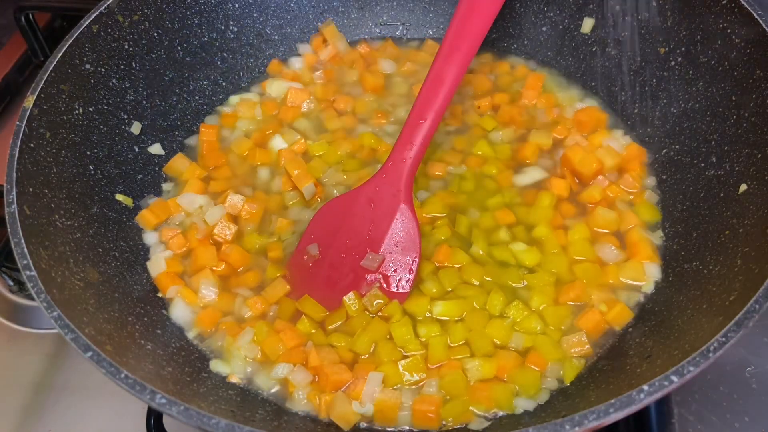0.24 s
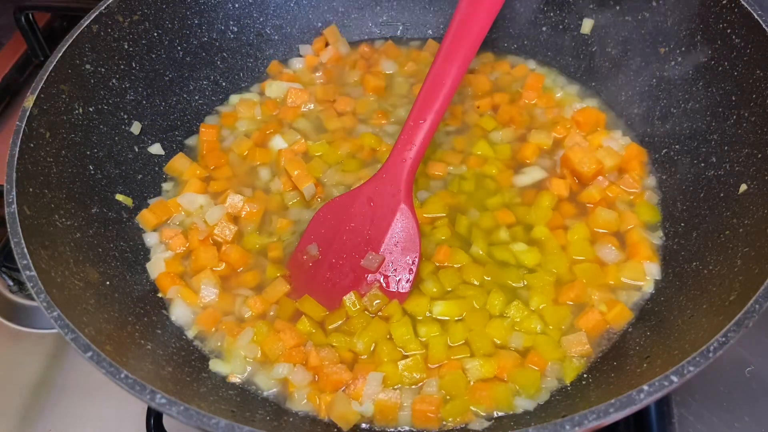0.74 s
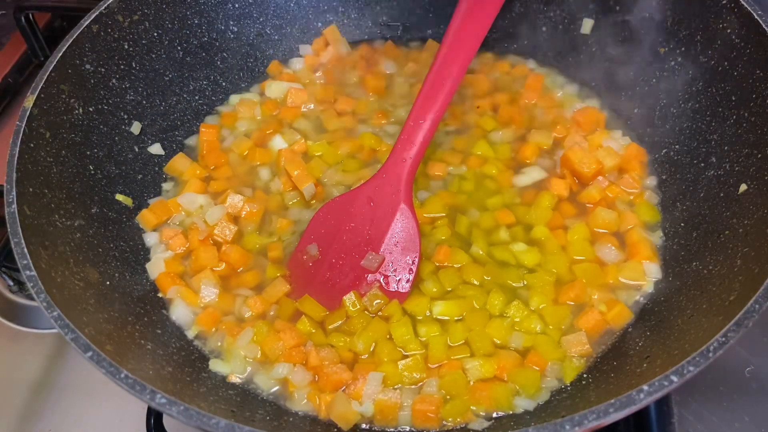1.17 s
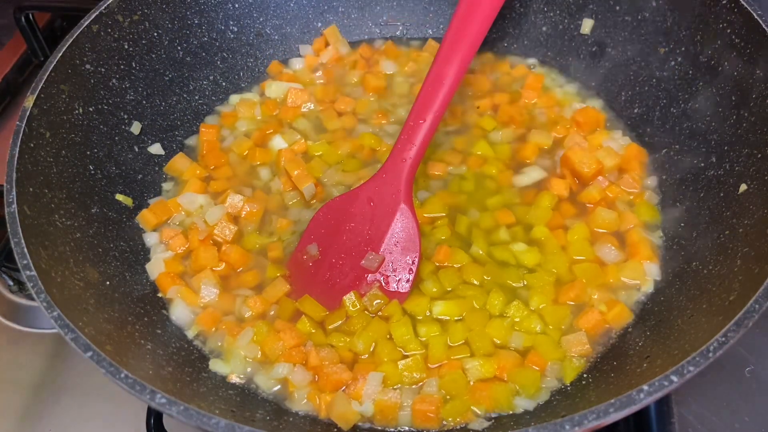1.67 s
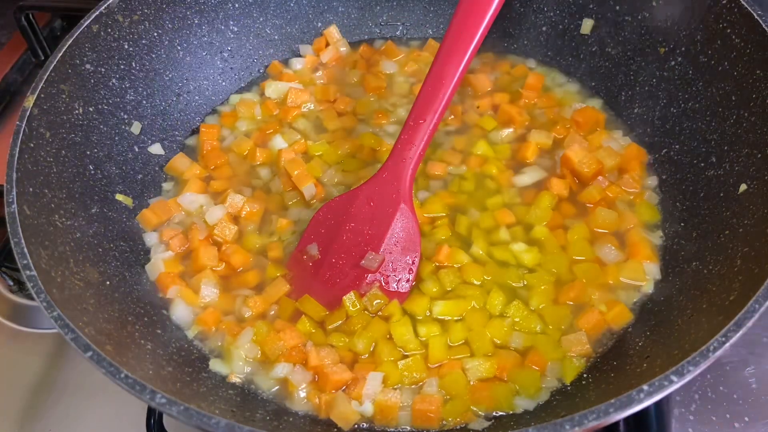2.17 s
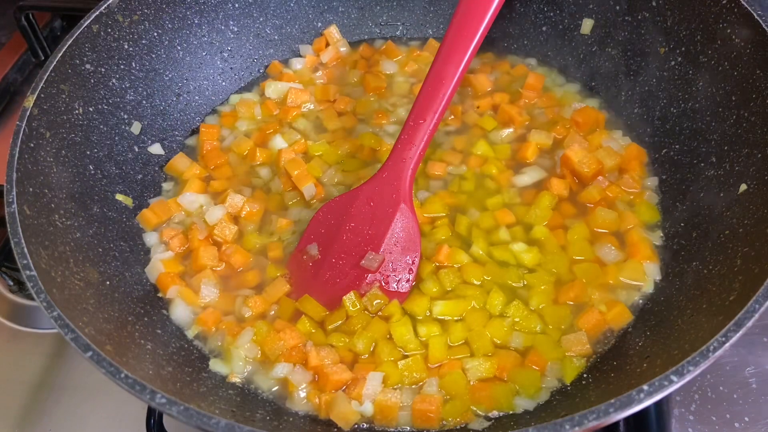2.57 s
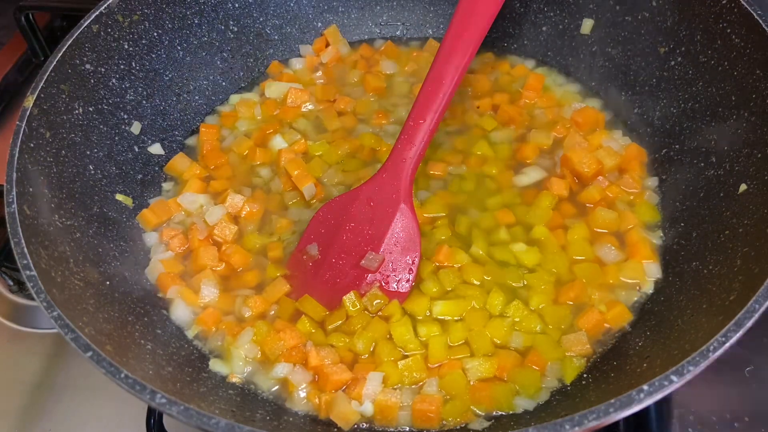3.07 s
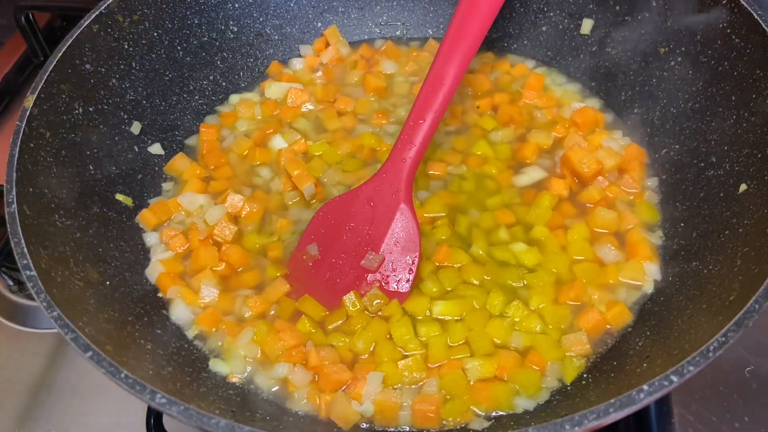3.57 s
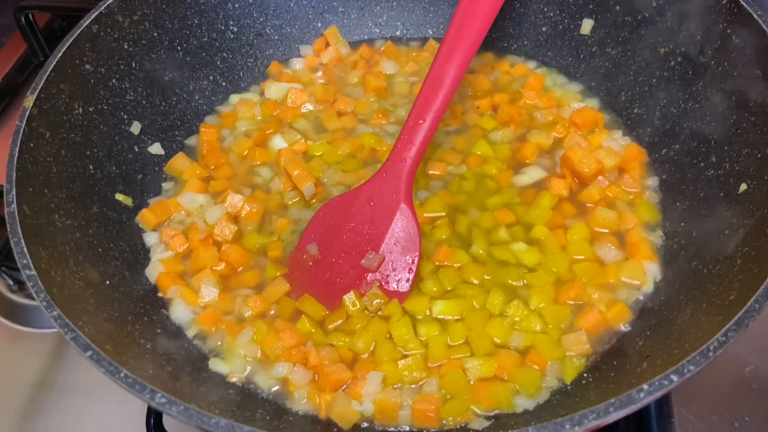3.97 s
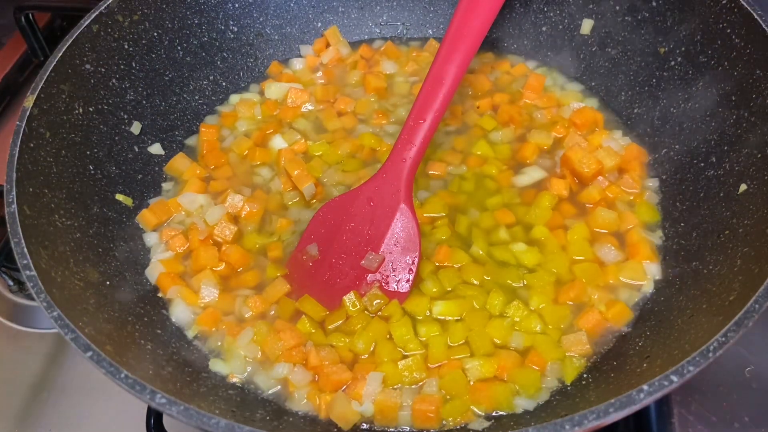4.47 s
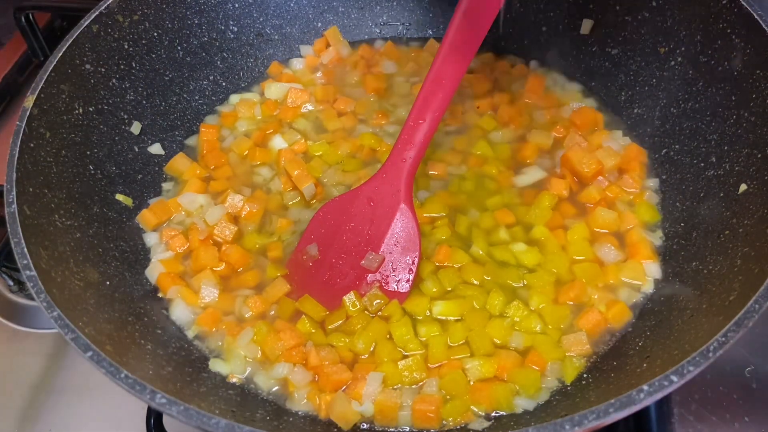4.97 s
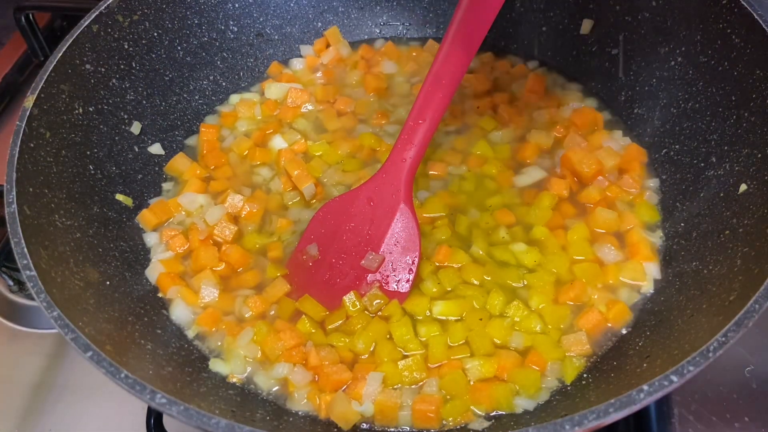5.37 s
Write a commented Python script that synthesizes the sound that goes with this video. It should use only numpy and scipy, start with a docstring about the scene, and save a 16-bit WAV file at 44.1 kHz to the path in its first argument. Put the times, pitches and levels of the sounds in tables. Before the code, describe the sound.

Close stereo pickup in a small, fairly dry home kitchen. Broth with diced vegetables simmers faintly, with fine hiss and tiny pops, over a soft burner rush, low rumble and mains hum. After two seconds, dull knocks lead to a dish landing with a short ringing clatter. Knocks and a hard utensil clack follow, then light ticks and another clack. Finally, thin plastic crackles brightly and close until the end.

```python
"""A small kitchen: diced vegetables simmer in broth in a pan, with a faint sizzle and tiny pops.
The burner's low rush and rumble join a mains hum. A dish is set down, utensils knock and click on
the worktop, and then a thin plastic wrapper is crinkled close by; the room answers these near sounds.
Short noise bursts make the contacts, fading sines and resonances the ringing, and shaped noise the rest."""
import sys
import numpy as np
from scipy import signal
from scipy.fft import rfft, irfft, next_fast_len
from scipy.io import wavfile
from scipy.ndimage import uniform_filter1d, map_coordinates

SR = 44100
rng = np.random.default_rng(int(sys.argv[2]) if len(sys.argv) > 2 else 0)


def master_out(mix):
    """Clip the mix to full scale and print it as 16-bit PCM to the path in sys.argv[1]."""
    frames = np.transpose(np.atleast_2d(mix))
    ceiling = np.clip(frames, -1, 1)
    pcm = np.round(ceiling * 32767).astype(np.int16)
    wavfile.write(sys.argv[1], SR, pcm)


N = 248503  # length in samples

# Levels in the tables are starting levels: the functions below add their own gains.
# Colours are relative, because every colouring filter is scaled to unit energy.
# "Left over right" says how many dB louder the left side is.

# The wrapper is held and whispers faintly. Each row: start in seconds, level in dB, hold in seconds.
HELD = [(4.535, -55, 0.7)]
# The wrapper is squeezed and rustles. Each row: start in seconds, level in dB, hold in seconds.
SQUEEZES = [(4.73, -43, 0.099), (4.90, -45, 0.083), (4.988, -34.5, 0.025), (5.22, -42, 0.04),
            (5.41, -42.5, 0.069), (5.618, -40.5, 0.021)]
SQUEEZE_ATTACK_S, SQUEEZE_RELEASE_S = 0.04, 0.048  # to swell and to fade by 20 dB
# The creases snap. Each row: start in seconds, level in dB, left over right in dB.
SNAPS = [(4.6497, -35, 1), (4.6767, -21, 3.5), (4.7031, -21, -3), (4.7245, -14.5, 1), (4.7535, -23, 5),
         (4.8415, -32, 3), (4.8792, -10.5, 2), (4.961, -34, 4), (4.9755, -8, 3.5), (4.987, -10, 3),
         (4.991, -11, 4), (5.0158, -8, 1.5), (5.0575, -19, 2), (5.0645, -22.5, 4), (5.1915, -26.5, 3),
         (5.2015, -22.5, 5), (5.2173, -8.5, 2), (5.2303, -19.5, 2), (5.2527, -18.5, 1), (5.264, -19.5, -1),
         (5.287, -36, 1), (5.296, -24, 2), (5.3816, -22.5, 1.5), (5.3895, -16, 1.5), (5.4175, -19, 3),
         (5.4212, -14.5, -4), (5.424, -6, 4.5), (5.4392, -20, 1), (5.4555, -22.5, 5), (5.618, -16, -3),
         (5.6243, -11, 6.5)]
# Colour of the snaps and the rustle. Each row: frequency in Hz, level in dB.
SNAP_COLOUR = [(150, -10.5), (300, -8.5), (500, -6.5), (750, -10.5), (1100, -6.5), (1700, -8), (2900, -9.5),
               (5000, -5.5), (7400, 6.5), (9000, -2), (11500, 1.5), (13500, -1), (15500, -4)]
SLIP_S, SLIP_LOSS_DB = 0.014, 14  # slips follow a snap within this time, this much weaker
# Whole panels buckle with a lower crack. Each row: start in seconds, level in dB, left over right in dB.
BUCKLES = [(4.987, -23.5, 7), (5.0154, -22, 4), (5.065, -27, -1), (5.264, -27.5, 3), (5.4095, -15, -0.5),
           (5.421, -36, 0), (5.482, -30, 4)]
# Colour of the buckling. Each row: frequency in Hz, level in dB.
BUCKLE_COLOUR = [(180, -46), (300, -20), (1100, 3), (1730, 9.5), (3500, -10), (4170, 8), (4910, -29),
                 (6000, -19), (7800, -46), (13200, -120)]
# The film slides on itself with a thin scrape. Each row: start in seconds, level in dB, hold in seconds.
SLIDES = [(4.908, -42.5, .015), (5.337, -50, .004)]
SLIDE_HZ = 4020
SLIDE_ATTACK_S, SLIDE_RELEASE_S = 0.026, 0.039  # to swell and to fade by 20 dB

# Dull knocks on the worktop. Each row: start in seconds, level in dB, left over right in dB.
KNOCKS = [(2.28, -34, 3), (2.357, -26, 3.5), (2.393, -31, -1), (3.0705, -38, 0), (3.134, -36.5, -1),
          (3.566, -29.5, -5), (3.5845, -17.5, -2.5)]
# Colour of the knocks. Each row: frequency in Hz, level in dB.
KNOCK_COLOUR = [(100, -1), (250, -7), (500, -3.5), (950, -10.5), (1400, -6.5), (1800, -14.5), (2200, -12.5),
                (3400, -22), (4800, -17), (8000, -30.5), (15000, -31)]
# Sharp utensil clacks. Each row: start in seconds, level in dB, left over right in dB,
# hollow ring in Hz, ring level in dB, time for the ring to fade by 60 dB in seconds.
CLACKS = [(3.7073, -10.5, -1, 378, -39.5, 0.15), (4.4204, -14.5, 1.5, 1065, -19.5, 0.019)]
# Colour of the clack itself. Each row: frequency in Hz, level in dB.
CLACK_COLOUR = [(200, -34), (360, -0.5), (650, -13), (1150, -7.5), (1800, -3.5), (2500, -9.5), (3700, -4.5),
                (5200, -9), (7500, -9.5), (11500, -11), (15500, -20)]
# Colour of the bright after-ring of a clack. Each row: frequency in Hz, level in dB.
AFTER_RING_COLOUR = [(1500, -12), (1800, -5), (2600, -11), (3400, 4), (4200, 4.5), (5200, -1), (7500, -11)]
# The utensil's own note, this far below the clack's level in the table
UTENSIL_HZ, UTENSIL_T60_S, UTENSIL_BELOW_DB = 3480, 0.032, 14.5
# A light utensil ticks on the worktop. Each row: start in seconds, level in dB.
TICKS = [(2.176, -35), (4.0585, -23), (4.0838, -10), (4.094, -23.5), (4.111, -21.5), (4.130, -29.5),
         (4.16, -27.5), (4.1657, -32), (4.233, -31), (4.2897, -26)]
# Colour of the ticks. Each row: frequency in Hz, level in dB.
TICK_COLOUR = [(300, -7), (950, -6.5), (2000, 1.5), (3500, -7), (4500, -2.5), (5300, -2.5), (6300, -13.5),
               (8000, -26.5), (15000, -26)]
TICK_PAN_DB = 3  # left over right
# The light utensil's note, this far below the tick's level in the table
TICK_RING_HZ, TICK_RING_T60_S, TICK_RING_BELOW_DB = 5330, 0.015, 12

# The dish touches, lands and rocks. Each row: start in seconds, level in dB, left over right in dB.
DISH_TOUCHES = [(2.396, -42, 11), (2.4832, -19.5, 9.5), (2.4882, -20, 0), (2.4921, -16.5, 1),
                (2.5001, -23.5, 2), (2.509, -24, 1), (2.523, -29, 0)]
# Notes the dish rings at. Each row: frequency in Hz, level in dB, time to fade by 60 dB in seconds.
DISH_MODES = [(143, -5, 0.3), (175.7, -6, 0.32), (413, -12, 0.19), (504, -8.5, 0.19), (559.6, -6, 0.16),
              (610.7, -10, 0.13), (886, -5.5, 0.12), (3680, -9, 0.13), (3952, 2, 0.16), (4918, -9, 0.15),
              (4970, -4.5, 0.099), (5800, -17, 0.1)]
# Colour of the dish's clatter. Each row: frequency in Hz, level in dB.
DISH_COLOUR = [(90, -8), (160, 3.5), (260, -8.5), (520, -1.5), (900, -11.5), (1200, -14.5), (2400, -19),
               (3200, -22), (3850, -9), (4400, -20), (5000, -4.5), (5800, -20.5), (11000, -31),
               (14000, -38)]
# Soft low thuds. Each row: start in seconds, level in dB, pitch in Hz, time to fade by 60 dB in seconds.
THUDS = [(1.008, -46.5, 128.4, 0.22), (1.361, -41.5, 144, 0.097), (2.513, -36, 152, 0.16),
         (3.587, -33, 241, 0.14), (3.964, -27.5, 102, 0.098), (3.989, -23.5, 73.4, 0.069)]
# Thin high pips. Each row: start in seconds, level in dB.
PIPS = [(3.0883, -44.5), (3.2575, -44.5), (3.3966, -39.5), (3.428, -44), (5.3317, -39), (5.338, -33.5),
        (5.346, -41.5)]
# Colour of the pips. Each row: frequency in Hz, level in dB.
PIP_COLOUR = [(3000, -19.5), (4000, -24), (5000, -21), (6700, -28), (7500, 0.5), (8400, -39), (11000, -23)]
PIP_PAN_DB = 2  # left over right

# Colour of the pan's hiss. Each row: frequency in Hz, level in dB.
SIZZLE_COLOUR = [(1500, -9), (3000, -7.5), (4200, -5.5), (7000, 0), (11000, -2.5), (15500, -1.5)]
SIZZLE_DB = -60.5  # the steady simmer
# The broth wells up against the hot rim. Each row: start in seconds, level in dB, hold in seconds.
SURGES = [(.995, -58.5, 0.053), (1.335, -59, 0.015)]
SURGE_ATTACK_S, SURGE_RELEASE_S = 0.11, 0.054  # to swell and to fade by 20 dB
SPIT_ABOVE_DB = 7  # bubbles spit about this far above the surge of the moment
# Colour of the spitting. Each row: frequency in Hz, level in dB.
SPIT_COLOUR = [(1000, 1), (3000, -1), (7000, 3), (15000, 2)]
# The larger bubbles burst with a sharp tick. Each row: start in seconds, level in dB.
POPS = [(0.4552, -41), (0.619, -42.5), (.681, -48), (.75, -44), (1.1059, -44), (1.5504, -50), (1.8293, -42),
        (2.068, -43), (2.232, -45), (3.5075, -37)]
# Colour of the bursting bubbles. Each row: frequency in Hz, level in dB.
POP_COLOUR = [(1500, 1), (4000, -11.5), (7000, 2), (11000, 4.5), (15500, 1.5)]
# Steam escapes in a faint whistle. Each row: start in seconds, level in dB, hold in seconds.
WHISTLES = [(.67, -65.5, 0.056), (1.14, -69, 0.4)]
WHISTLE_HZ, WHISTLE_FADE_S = 2170, 0.076  # pitch; time to swell or fade by 20 dB
GRAIN_SPREAD_DB = 3.5  # average gain of a grain over the smallest, before a cap

# Colour of the burner's rush. Each row: frequency in Hz, level in dB.
BURNER_COLOUR = [(150, -10.5), (250, -7), (402, 0), (566, -1.5), (1090, -2), (1430, 2.5), (1580, -7.5),
                 (1990, -6.5), (2150, -8), (2300, -9), (3500, -14.5), (4550, -9), (7700, -120)]
# Colour of the low rumble. Each row: frequency in Hz, level in dB.
RUMBLE_COLOUR = [(18, -12), (30, -15), (54, -4.5), (76, -10), (151, -15.5), (220, -27), (249, -23),
                 (350, -31.5), (460, -78), (770, -120)]
# Rise and fall of the rumble. Each row: time in seconds, level in dB.
RUMBLE_LEVEL = [(0, -63), (.55, -70.5), (1.0, -61.5), (2.3, -61.5), (3.0, -61), (5.6, -59)]
BURNER_FOLLOWS = 0.36  # share of the rumble's rise and fall in dB heard in the rush

# How alike left and right are. Each row: frequency in Hz, correlation (1 is identical).
LIKENESS = [(60, 0.91), (130, 0.84), (300, 0.51), (700, 0.1), (1300, 0.46), (3000, 0.23), (7000, 0.51),
            (15000, 0.037)]
FRONT_LAG_S, LAG_FROM_HZ = 0.000227, 6500  # treble lag on the left, and where it begins
KITCHEN_T60_S = 0.18  # time for the reflections to fade by 60 dB
CUTOFF_HZ = 16300


def wrapper():
    """Each squeeze raises a gritty rustle; creases snap one by one, panels buckle and the film slides."""
    effort = swells(SQUEEZES, SQUEEZE_ATTACK_S, SQUEEZE_RELEASE_S)
    whisper = swells(HELD, SQUEEZE_ATTACK_S, SQUEEZE_RELEASE_S)
    loudness = np.hypot(effort, whisper)
    grit = pitched_grains(2500, 1500, 15000, cycles=12) + rms_one(grains(4000))
    flicker = from_db(0.25 + 2.0 * drift(140))
    rustle = loudness * flicker * rms_one(coloured(grit, SNAP_COLOUR))
    scrape = swells(SLIDES, SLIDE_ATTACK_S, SLIDE_RELEASE_S) * narrow_noise(SLIDE_HZ, width_hz=600)
    snaps = contacts(with_slips(SNAPS), SNAP_COLOUR, crack_t60=0.011, body_t60=0.045, body_db=-23,
                     rise_s=0.0004, direct_share=0.92, vary_db=2.5)
    buckles = contacts(BUCKLES, BUCKLE_COLOUR, crack_t60=0.015, body_t60=0.036, body_db=-14.0)
    return from_front(rustle + scrape + from_db(-0.5) * snaps + from_db(-3.5) * buckles)


def with_slips(snaps, count=2):
    """After a crease snaps it gives way further in small, weaker slips."""
    rows = list(snaps)
    for s, level_db, pan_db in snaps:
        for delay in SLIP_S * rng.uniform(0.19, 1, count):
            rows.append((s + delay, level_db - SLIP_LOSS_DB, pan_db))
    return rows


def utensils():
    """Dull knocks, hollow clacks with a bright after-ring, and the small rattle of a light utensil."""
    ticks = [(s, level_db, TICK_PAN_DB) for s, level_db in TICKS]
    blows = [row[:3] for row in CLACKS]
    out = from_db(-8.0) * contacts(KNOCKS, KNOCK_COLOUR, crack_t60=0.028, body_t60=0.16, body_db=-14.5,
                                   left_lag_s=0.00038)
    out += from_db(-5.5) * contacts(blows, CLACK_COLOUR, crack_t60=0.016, body_t60=0.078, body_db=-19.5,
                                    left_lag_s=0.000346)
    out += from_db(-26.5) * contacts(blows, AFTER_RING_COLOUR, crack_t60=0.035, body_t60=0.27, body_db=-6)
    out += from_db(-6) * contacts(ticks, TICK_COLOUR, crack_t60=0.0055, body_t60=0.06, body_db=-16.5,
                                  left_lag_s=0.00026, rise_s=0.00023, direct_share=0.89)
    for s, level_db, pan_db, hz, ring_db, t60 in CLACKS:
        hollow = from_db(ring_db) * ring(hz, t60)
        note = from_db(level_db - UTENSIL_BELOW_DB) * ring(UTENSIL_HZ, UTENSIL_T60_S)
        add(out, s, panned(pan_db) * (hollow + note))
    for s, level_db, pan_db in ticks:
        note = from_db(level_db - TICK_RING_BELOW_DB) * ring(TICK_RING_HZ, TICK_RING_T60_S)
        add(out, s, panned(pan_db) * note)
    return out


def dish():
    """The dish lands with a clatter; every touch adds energy to its modes, which ring on."""
    out = from_db(-6.5) * contacts(DISH_TOUCHES, DISH_COLOUR, crack_t60=0.012, body_t60=0.18, body_db=-9.5)
    touches, t = np.zeros((2, N)), np.arange(N) / SR
    for s, level_db, pan_db in DISH_TOUCHES:
        add(touches, s, (from_db(level_db) * panned(pan_db)) ** 2)
    # Each touch passes its energy on over 64 samples
    touches = uniform_filter1d(touches, size=64, axis=1)
    for hz, mode_db, t60 in DISH_MODES:
        kept = from_db(-60 / (t60 * SR)) ** 2  # share of energy left after one sample
        energy = signal.lfilter([1], [1, -kept], np.abs(touches) + 1e-20)
        tone = np.sin(2 * np.pi * (hz * t + rng.random()))
        out += from_db(mode_db - 15.5) * np.sqrt(energy) * tone
    return out


def thuds(soft_hz=260):
    """Soft blows set the worktop booming briefly: fading low sines through a low-pass filter."""
    out = np.zeros((2, N))
    for s, level_db, hz, t60 in THUDS:
        add(out, s, from_db(level_db) * ring(hz, t60))
    return signal.sosfilt(signal.butter(2, soft_hz, fs=SR, output="sos"), out)


def pips():
    """Faint, narrow, high ticks made of short bursts of noise."""
    rows = [(s, level_db, PIP_PAN_DB) for s, level_db in PIPS]
    return from_db(2.0) * contacts(rows, PIP_COLOUR, crack_t60=0.013, body_t60=0.11, body_db=-9,
                                   rise_s=0.00029)


def pan_sizzle():
    """Broth hisses at the hot rim, micro-bubbles burst as a fine crackle and larger ones ring, tick or spit."""
    surge = swells(SURGES, SURGE_ATTACK_S, SURGE_RELEASE_S)
    vigour = np.hypot(from_db(SIZZLE_DB), surge)
    # One noise common to both sides plus a weaker one for each side
    white = rng.standard_normal(N) + from_db(-11) * rng.standard_normal((2, N))
    hiss = from_db(-2.0 + 2.3 * drift(30.3)) * rms_one(coloured(white, SIZZLE_COLOUR))
    prickle = from_db(-4.0) * rms_one(coloured(grains(60), POP_COLOUR))
    crackle = coloured(pitched_grains(330, 7500, 15000, cycles=12),
                       [(4000, -15), (8000, -3), (12000, 0), (15500, 0)])
    simmer = vigour * (hiss + prickle + from_db(-4.5) * rms_one(crackle))
    ticks = contacts([(s, db, 0) for s, db in POPS], POP_COLOUR, crack_t60=0.0072, body_t60=0.03,
                     body_db=-19, rise_s=0.0001, vary_db=1.5, direct_share=1.0)
    bursts = scattered(SURGES, surge, reach_s=0.0078, above_db=SPIT_ABOVE_DB, spread_db=2.5, count=5)
    spits = contacts(bursts, SPIT_COLOUR, crack_t60=0.02, body_t60=0.049, body_db=-10.0)
    ringing_bubbles = from_db(-72.5) * pitched_grains(70, 500, 3000, cycles=9)
    steam = swells(WHISTLES, WHISTLE_FADE_S, WHISTLE_FADE_S) * narrow_noise(WHISTLE_HZ, width_hz=80)
    return from_front(simmer + ticks + spits) + ringing_bubbles + steam


def scattered(rows, gain, reach_s, above_db, spread_db, count):
    """A few clicks at random moments in and around each swell, their strength following the swell."""
    clicks = []
    for s, _, hold_s in rows:
        places = (np.arange(count) + rng.random(count)) / count
        moments = s - reach_s + (hold_s + 2 * reach_s) * places
        level_db = 20 * np.log10(np.interp(moments, np.arange(N) / SR, gain) + 1e-9)
        size_db, pan_db = spread_db * rng.standard_normal((2, count))
        clicks += zip(moments, level_db + above_db + size_db, pan_db)
    return clicks


def stove():
    """The burner's rush and uneven rumble are shaped noise; the wavering mains hum is a 50 Hz sine."""
    rumble_db, = in_time(RUMBLE_LEVEL)
    phase = 2 * np.pi * 50 * np.arange(N) / SR
    hum = from_db(-57.5 + 1.0 * drift(5.56)) * np.sqrt(2) * np.sin(phase + 0.96 * drift(5))
    rumble = from_db(rumble_db + 5.5) * noise(RUMBLE_COLOUR)
    rush_db = -59.0 + BURNER_FOLLOWS * (rumble_db - rumble_db.mean())
    rush = from_db(rush_db) * noise(BURNER_COLOUR)
    return (hum + rumble + rush) * panned(1.9)


def kitchen(x, wall_cut_hz=7000, gap_s=0.0016):
    """Diffuse reflections that build up quickly and die away, dulled by the walls."""
    t = np.arange(SR // 2) / SR
    fade = from_db(-60 * t / KITCHEN_T60_S)
    build_up = 1 - np.exp(-(t / gap_s) ** 2)
    tail = as_stereo(rng.standard_normal((2, len(t)))) * fade * build_up
    tail = signal.lfilter(*signal.butter(1, wall_cut_hz, fs=SR), tail / np.linalg.norm(tail[0]))
    return signal.oaconvolve(x, tail, axes=1)[:, :N]


def contacts(rows, spectrum, crack_t60, body_t60, body_db, left_lag_s=0, rise_s=0.00035, vary_db=0,
             direct_share=0.14, size=4096):
    """Each contact is a brief crack, later on the left if lagged, and a diffuse ring; colour may vary."""
    out, t = np.zeros((2, N)), np.arange(size) / SR
    rise = 1 - np.exp(-t / rise_s)
    crack = rise * from_db(-60 * t / crack_t60)
    body = rise * from_db(body_db - 60 * t / body_t60)
    for s, level_db, pan_db in rows:
        right = rng.standard_normal(size) * crack
        left = np.interp(t - left_lag_s, t, right, left=0)
        direct = np.array([left, right])
        diffuse = as_stereo(rng.standard_normal((2, size))) * (np.sqrt(1 - direct_share) * crack + body)
        own_colour = [(hz, db + vary_db * rng.standard_normal()) for hz, db in spectrum]
        burst = coloured(np.sqrt(direct_share) * direct + diffuse, own_colour)
        # Both sides get the energy of the plain envelope
        burst *= np.linalg.norm(crack + body) / np.linalg.norm(burst, axis=1, keepdims=True)
        add(out, s, from_db(level_db) * panned(pan_db) * burst)
    return out


def ring(hz, t60):
    """One struck mode: a sine that starts at height 1 and fades by 60 dB in t60 seconds."""
    t = np.arange(SR // 2) / SR
    return np.sin(2 * np.pi * hz * t) * from_db(-60 * t / t60)


def grains(per_s):
    """Random clicks, mostly small and a few large, each with its own strength on either side."""
    sizes = from_db(GRAIN_SPREAD_DB * np.minimum(rng.exponential(1, N), 4))
    turn = rng.uniform(0, 2 * np.pi, N)
    happens = rng.random(N) < per_s / SR
    return sizes * happens * np.array([np.cos(turn), np.cos(turn + 0.21)])


def pitched_grains(per_s, low_hz, high_hz, cycles, count=12):
    """Random tiny bursts, each ringing for a few cycles at one of several pitches; unit power."""
    out = np.zeros((2, N))
    for hz in np.geomspace(low_hz, high_hz, count):
        r, w = from_db(-60 * hz / (cycles * SR)), 2 * np.pi * hz / SR  # fade and turn per sample
        clicks = grains(per_s / count) + 1e-18
        out += signal.lfilter([1, 0, -1], [1, -2 * r * np.cos(w), r * r], clicks)
    return rms_one(out)


def narrow_noise(hz, width_hz):
    """Stereo noise in one resonance, unit power."""
    band = signal.butter(2, [hz - width_hz / 2, hz + width_hz / 2], "band", fs=SR, output="sos")
    return rms_one(signal.sosfilt(band, rng.standard_normal((2, N))))


def noise(spectrum):
    """Steady stereo noise of unit power."""
    return rms_one(coloured(as_stereo(rng.standard_normal((2, N))), spectrum, size=8192))


def swells(rows, attack_s, release_s):
    """Gain over time: each row swells, holds and fades, by 20 dB per attack or release time."""
    t, gain = np.arange(N) / SR, np.zeros(N)
    for s, db, hold_s in rows:
        before, after = np.maximum(s - t, 0), np.maximum(t - s - hold_s, 0)
        gain += from_db(db - 20 * before / attack_s - 20 * after / release_s)
    return gain


def drift(rate):
    """A wandering curve with spread 1: straight lines between random points, rate points a second."""
    knots = rng.standard_normal(int(rate * N / SR) + 3)
    return rms_one(map_coordinates(knots, [np.arange(N) * rate / SR], order=1))


def coloured(x, spectrum, size=2048):
    """Causal (minimum-phase) filter with the given spectrum and unit energy."""
    hz = np.arange(size // 2 + 1) * SR / size
    low, high = np.array(spectrum)[[0, -1], 0]
    # Beyond both ends of the table the sound falls away
    skirts = 1 / np.sqrt((1 + (low / (hz + 1)) ** 6) * (1 + (hz / high / 1.2) ** 12))
    # Folding the cepstrum forward in time puts the energy as early as possible
    cepstrum = irfft(np.log(from_db(at_hz(spectrum, hz)) * skirts + 1e-6))
    cepstrum[1:size // 2] *= 2
    cepstrum[size // 2 + 1:] = 0
    response = irfft(np.exp(rfft(cepstrum)))
    response /= np.linalg.norm(response)
    return signal.oaconvolve(x, response[None], axes=1)[:, :x.shape[1]]


def as_stereo(x):
    """Two unrelated signals become left and right, as alike at each frequency as LIKENESS says."""
    size = next_fast_len(x.shape[1])
    a, b = rfft(x, size)
    alike = np.clip(at_hz(LIKENESS, np.arange(len(a)) * SR / size), -0.99, 0.99)
    mid, side = np.sqrt((1 + alike) / 2) * a, np.sqrt((1 - alike) / 2) * b
    return irfft(np.array([mid + side, mid - side]), size)[:, :x.shape[1]]


def from_front(x):
    """Sound from close in front is in step on both sides, but its high treble lags on the left."""
    size = next_fast_len(N + 1024)
    hz = np.arange(size // 2 + 1) * SR / size
    turn = -2 * np.pi * np.maximum(hz - LAG_FROM_HZ, 0) * FRONT_LAG_S
    left = irfft(rfft(x[0], size) * np.exp(1j * turn), size)[:N]
    return np.array([left, x[1]])


def panned(db):
    """Left and right gains for a level difference, left over right."""
    return from_db(np.array([[db], [-db]]) / 2)


def add(out, s, sound):
    """Mix a short sound in at time s."""
    i = int(np.clip(round(s * SR), 0, N - 1))
    out[:, i:i + sound.shape[-1]] += sound[..., :N - i]


def in_time(rows):
    """Curve rows to one value per sample and column."""
    s, *columns = np.transpose(rows)
    return [np.interp(np.arange(N) / SR, s, c) for c in columns]


def at_hz(points, hz):
    """Read a table on a log-frequency axis."""
    f, value = np.transpose(points)
    return np.interp(np.log(np.maximum(hz, 1)), np.log(f), value)


def from_db(db):
    """Decibels to gain."""
    return 10 ** (np.asarray(db) / 20)


def rms_one(x):
    """Scale to unit power."""
    return x / np.sqrt(np.mean(x ** 2) + 1e-20)


def scene():
    """Near sounds with their share of the room, over the pan and the stove."""
    crinkle = wrapper()
    taps = utensils() + pips()
    clink = dish() + thuds()
    room = kitchen(from_db(-6) * crinkle + from_db(-7.5) * taps + from_db(-5.0) * clink)
    return crinkle + taps + clink + room + pan_sizzle() + stove()


def record(dry):
    """The deepest bass rolls away and the top is cut steeply."""
    dry = signal.sosfilt(signal.butter(6, 36, "high", fs=SR, output="sos"), dry)
    return signal.sosfilt(signal.ellip(10, 0.2, 90, CUTOFF_HZ, fs=SR, output="sos"), dry)


dry = scene()
out = record(dry)
master_out(out)
```